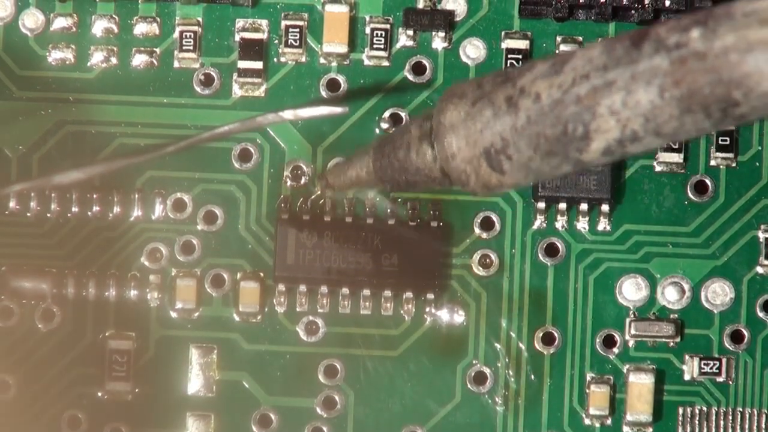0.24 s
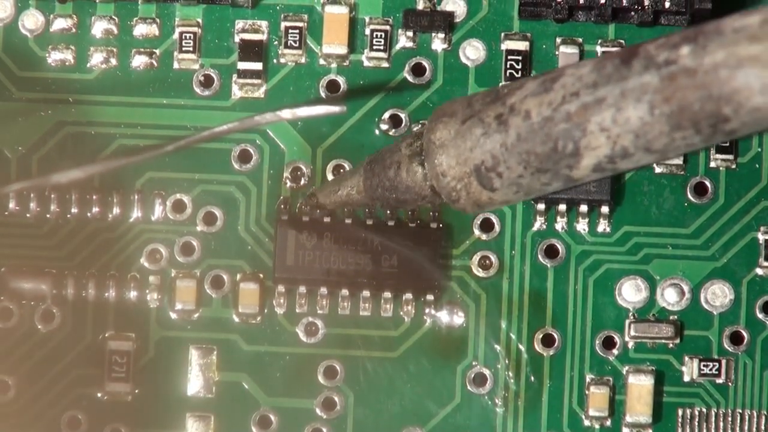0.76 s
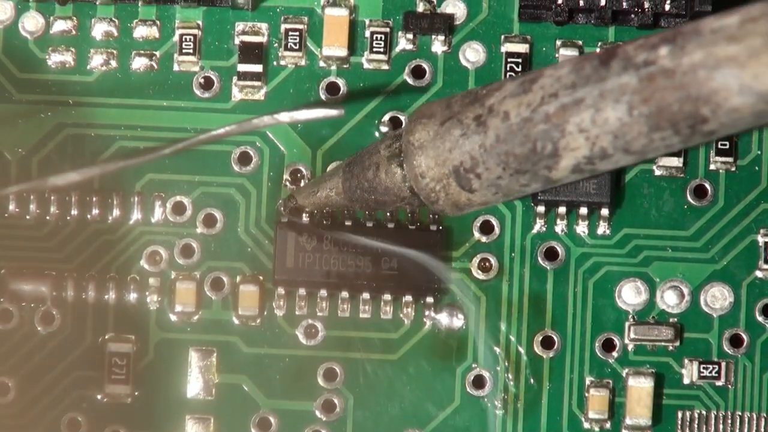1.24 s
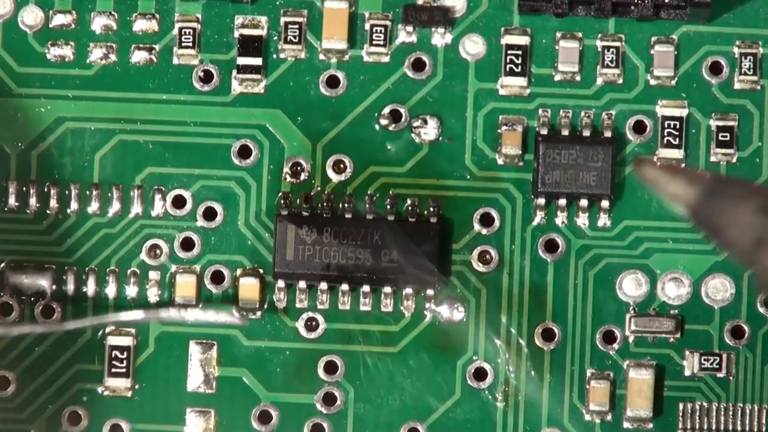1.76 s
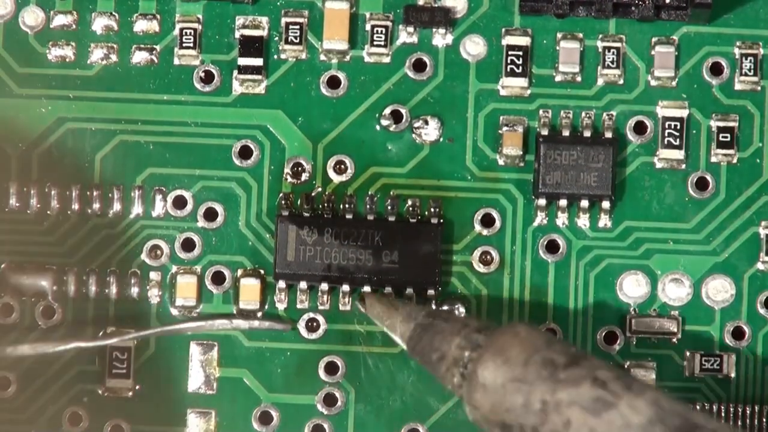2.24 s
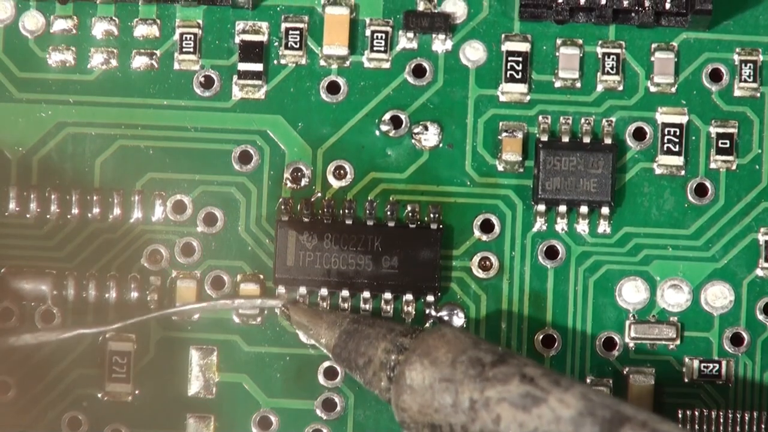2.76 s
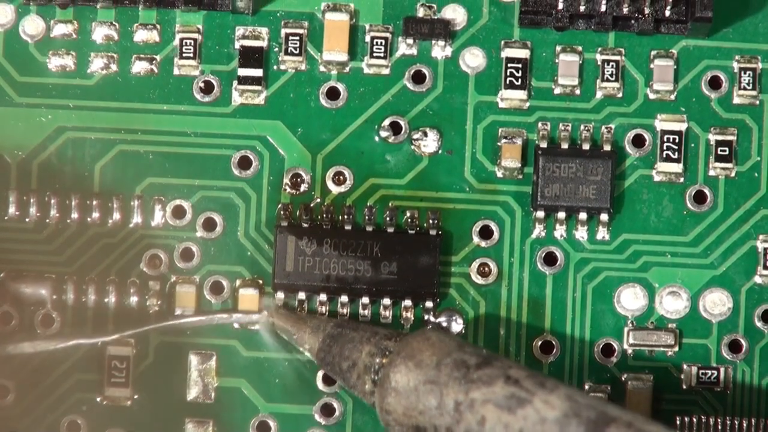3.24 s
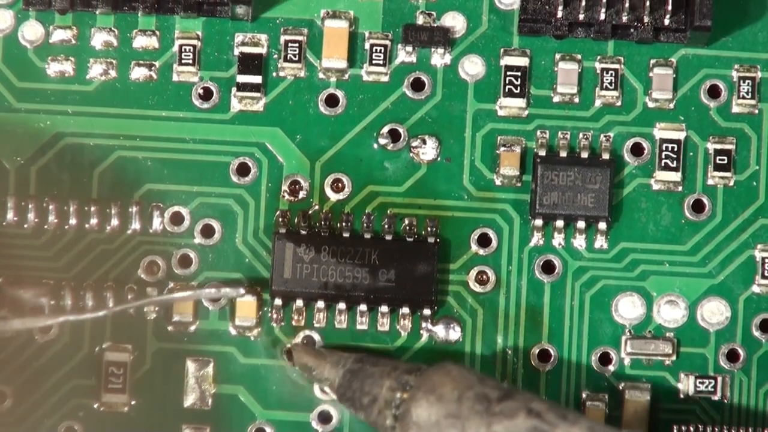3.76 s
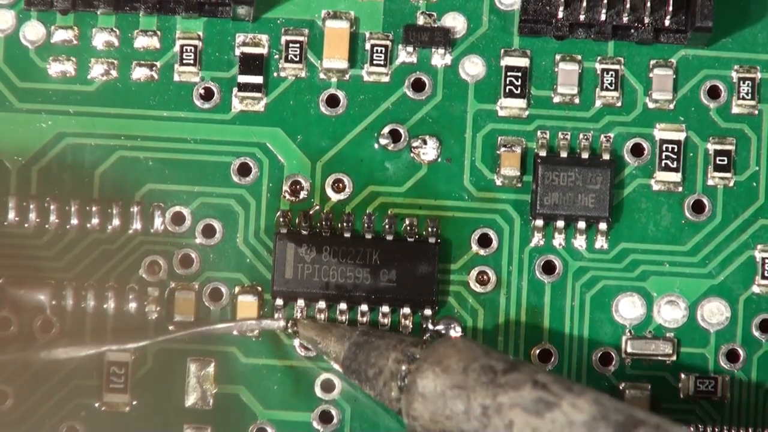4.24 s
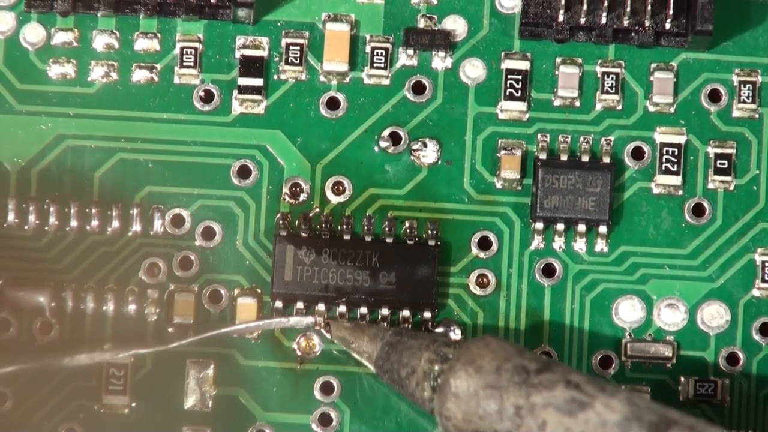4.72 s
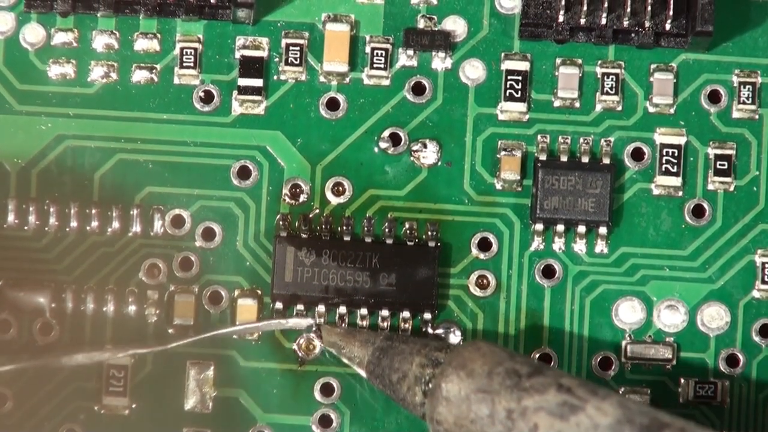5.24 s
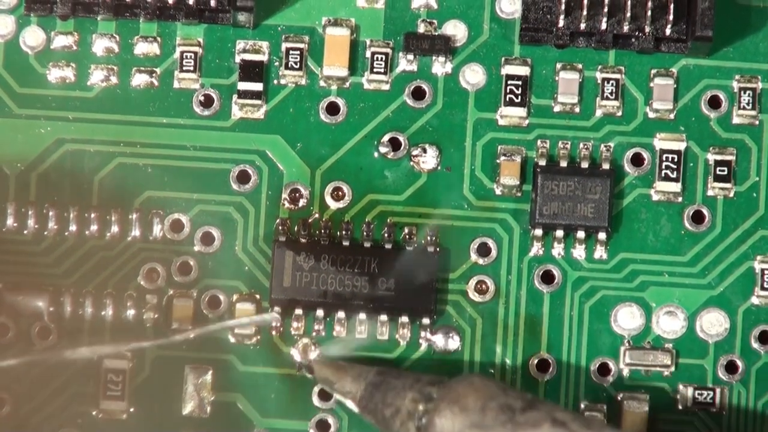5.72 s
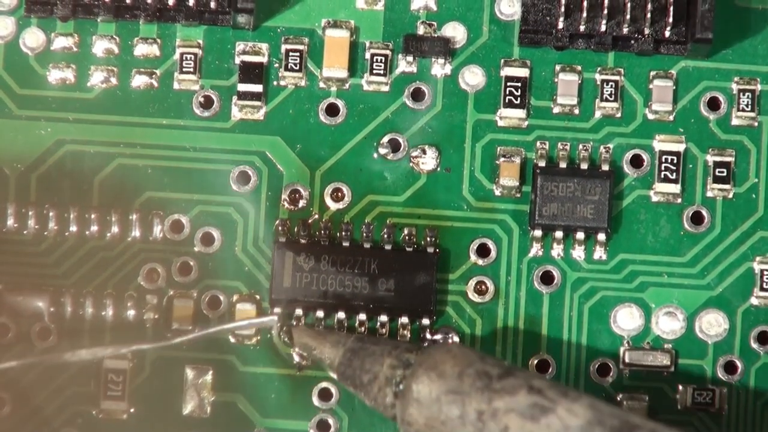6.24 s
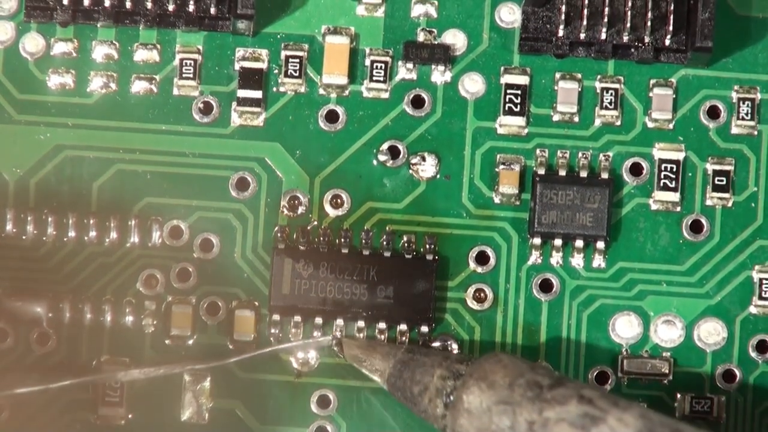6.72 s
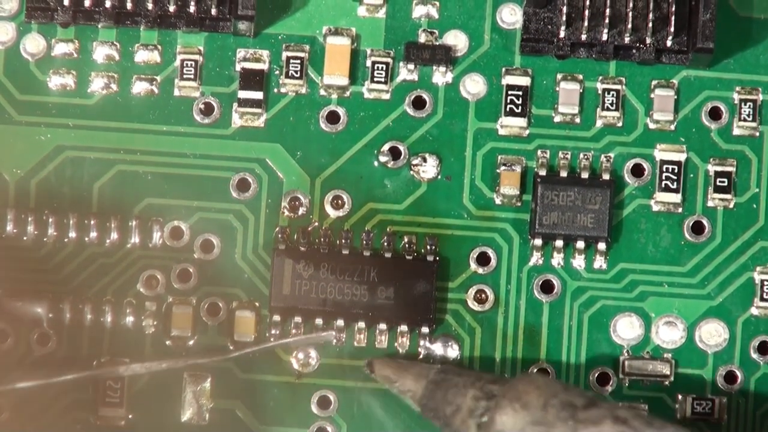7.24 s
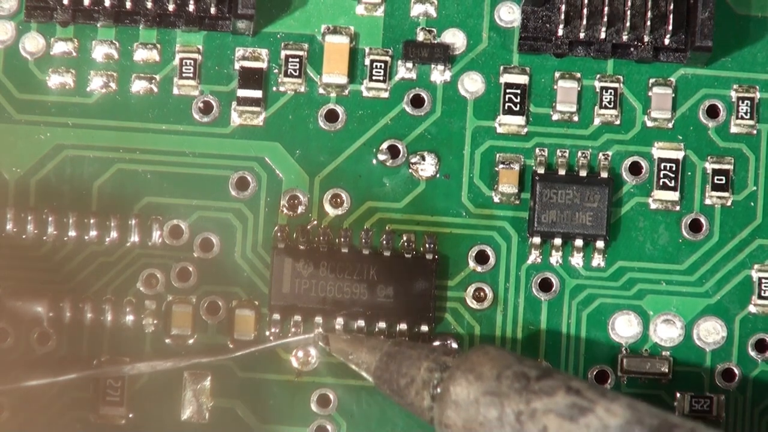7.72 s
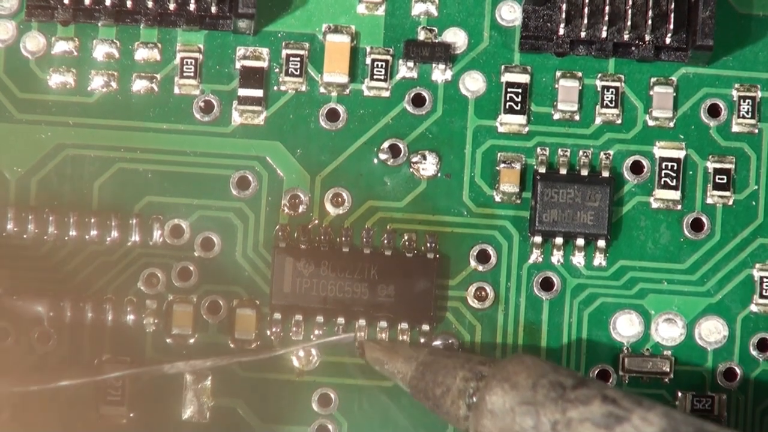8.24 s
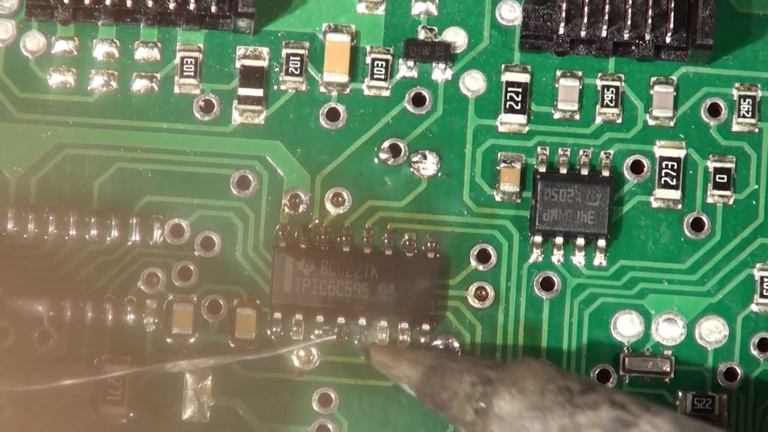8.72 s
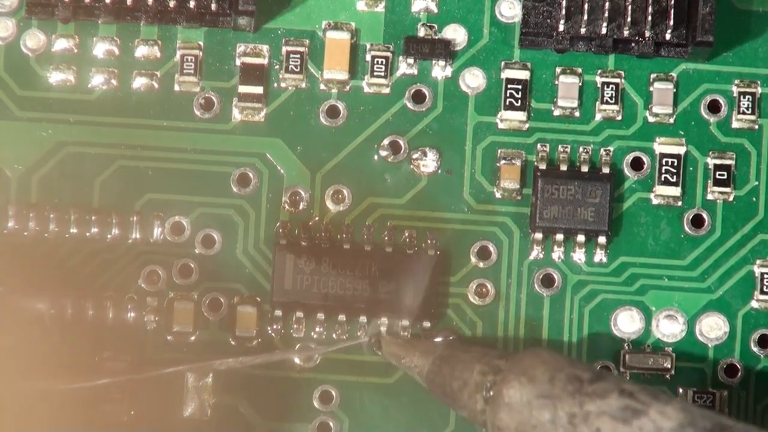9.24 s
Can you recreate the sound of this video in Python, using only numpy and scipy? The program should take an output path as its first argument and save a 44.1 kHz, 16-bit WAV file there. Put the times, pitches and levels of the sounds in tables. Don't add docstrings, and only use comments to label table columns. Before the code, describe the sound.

A steady electrical hum with a fine metallic buzz runs throughout while a soldering iron makes sparse small ticks on circuit board pins.

```python
import sys
import numpy as np
from scipy import signal
from scipy.fft import rfft, irfft, next_fast_len
from scipy.io import wavfile

SR = 44100
rng = np.random.default_rng(int(sys.argv[2]) if len(sys.argv) > 2 else 0)


def linear_from_db(decibels):
    return 10 ** (np.asarray(decibels, float) / 20)


def master(y):
    cut = np.clip(np.atleast_2d(y).T, -1, 1)
    pcm = np.round(cut * 32767)
    wavfile.write(sys.argv[1], SR, pcm.astype(np.int16))


N = 418509

# time in seconds, frequency in Hz.
MAINS = [(0, 50.0492), (1.9, 50.0516), (3.7, 50.0523), (5.6, 50.0515), (7.5, 50.0491), (9.5, 50.0448)]


def evened(x):
    return x / np.sqrt(np.mean(x ** 2) + 1e-30)


def read(points, hz):
    f, value = np.transpose(points)
    return np.interp(np.log(hz + 1), np.log(f + 1), value)


def add(mix, s, sound):
    part = mix[round(s * SR):][:len(sound)]
    part += sound[:len(part)]


def coloured(x, points):
    length = x.shape[-1]
    size = next_fast_len(length)
    gain = linear_from_db(read(points, np.fft.rfftfreq(size, 1 / SR)))
    return irfft(rfft(x, size) * gain, size)[..., :length]


def band(x, lo_hz, hi_hz):
    edges = np.clip([lo_hz, hi_hz], 10, SR / 2.1)
    return signal.sosfilt(signal.butter(2, edges, "band", fs=SR, output="sos"), x)


def floor():
    # frequency in Hz, level in dB per Hz.
    air_curve = [(20, -85), (35, -87.5), (75, -81.5), (125, -82), (225, -74.5), (375, -83.5), (700, -85.5),
                 (1600, -88.5), (2100, -91.5), (3200, -93.5), (7000, -99.5), (9000, -99.5), (11800, -97.5),
                 (14700, -102)]
    # frequency in Hz, level in dB per Hz.
    hiss_curve = [(60, -136), (125, -124), (225, -84.5), (425, -82.5), (900, -83.5), (1600, -87.5),
                  (2200, -90), (3500, -95), (7000, -102), (10800, -104), (11800, -113)]
    white = rng.standard_normal((2, N)) * np.sqrt(SR / 2)
    air = linear_from_db(-1.0) * coloured(white[0], air_curve)
    hiss = linear_from_db(-0.5) * coloured(white[1], hiss_curve)
    return air * linear_from_db([[-.8], [.8]]) + hiss * np.array([[1], [-1]])


def mains_turns():
    return np.cumsum(np.interp(np.arange(N) / SR, *np.transpose(MAINS))) / SR


def hum():
    # multiple of mains, left level in dB, right level in dB.
    strong = [(2, -48.5, -48.5), (3, -51, -49.5), (4, -46.5, -48), (5, -58, -55), (6, -48, -47.5),
              (7, -72, -96), (8, -88.5, -84), (9, -66, -64.5), (10, -82, -70), (11, -63.5, -63.5),
              (12, -77, -61), (13, -59.5, -67), (14, -71, -61.5), (15, -73, -63.5), (16, -72, -65),
              (17, -67.5, -64.5), (18, -76, -66), (20, -77, -64.5), (21, -69.5, -66), (22, -87, -67.5),
              (23, -84, -73), (24, -68, -64.5), (25, -73, -62.5), (26, -89, -79), (31, -66, -58.5),
              (32, -68.5, -64), (33, -68.5, -66), (34, -78, -78), (35, -72, -68.5), (45, -66.5, -62.5)]
    # frequency in Hz, level in dB.
    faint = [(50, -77.5), (900, -79), (1500, -81), (2000, -80), (2600, -82.5), (3200, -81), (4500, -95),
             (7000, -84), (8500, -87.5)]
    # multiple of mains, level in dB.
    whine = [(40, -76), (44, -84), (48, -74.5), (50, -79), (51, -73), (53, -73), (54, -71), (63, -85),
             (69, -76), (74, -74.5), (76, -78.5), (88, -77.5), (89, -74.5), (91, -74.5), (97, -90),
             (37, -74), (104, -78), (112, -80), (133, -81), (138, -78)]
    order = np.arange(171)
    db = read(faint, order * MAINS[0][1]) + 3.0 * rng.standard_normal((2, 171)).clip(-3, 1.5)
    for k, left_db, right_db in strong:
        db[:, round(k)] = left_db, right_db
    for k, whine_db in whine:
        db[:, round(k)] = whine_db

    core_kick, coil_kick = .394, .413
    kick = np.where(order % 2, coil_kick, core_kick)
    spread = np.pi * order ** 2 / 8.6
    scatter = spread + rng.standard_normal(171) + rng.standard_normal((2, 171)) / 4
    phase = np.where(order <= 6, -2 * np.pi * kick * order, scatter)
    lines = np.where(order > 0, linear_from_db(db) * np.exp(1j * phase), 0)
    lines[1, 1] = lines[0, 1]
    cycle = irfft(lines, 8192) * 8192 / np.sqrt(2)
    turn = mains_turns() % 1
    return np.array([np.interp(turn, np.arange(8192) / 8192, c, period=1) for c in cycle])


def rattle(level_db=-61, jitter_s=6e-5, uneven=.5, swing_db=7, busiest=0.066, case_db=9):
    # frequency in Hz, level in dB.
    plate_curve = [(1500, -61), (2600, -18), (4500, 5), (6500, 5.5), (9000, -0.5), (11800, -1), (14500, -6)]
    # frequency in Hz, width in Hz, level in dB.
    case_modes = [(5160, 32, -10), (5920, 170, -3.5), (6500, 100, -4), (6920, 38, -3.5), (7660, 32, 1),
                  (8420, 48, -6), (9370, 64, 0), (10300, 58, -6), (9890, 150, 0.5), (11700, 38, -3),
                  (11900, 160, 1)]
    place = rng.random(90)
    swing = linear_from_db(swing_db * np.cos(2 * np.pi * (place - busiest)))
    size = swing * rng.choice([-1, 1], 90) * rng.uniform(0.29, 1, 90)
    turns = np.arange(round(N / SR * MAINS[0][1]) + 1)[:, None] + place
    at = np.interp(turns, mains_turns(), np.arange(N)) + jitter_s * SR * rng.standard_normal(turns.shape)
    at = np.clip(at.round(), 0, N - 1).astype(int)
    taps = np.zeros(N)
    np.add.at(taps, at, size * (1 + uneven * rng.standard_normal(turns.shape)))
    taps[-1] = 0

    t = np.arange(3000) / SR
    case = np.zeros(3000)
    for hz, width_hz, db in case_modes:
        decay = np.exp(-np.pi * width_hz * t)
        case += linear_from_db(db + case_db) * 2 * np.pi * width_hz / SR * decay * np.cos(2 * np.pi * hz * t)
    rung = taps + signal.oaconvolve(taps, case)[:N]
    return linear_from_db(level_db) * evened(coloured(rung, plate_curve)) * linear_from_db([[-.4], [.4]])


def sleeve():
    # start in seconds, length in seconds, start level in dB, end level in dB.
    strokes = [
        (1.535, .1, -55, -46.5),
        (1.749, .03, -54, -60),
        (1.863, .03, -58, -60),
    ]
    lift_db_per_s, fibres_per_s = 420, 1500
    out, t = np.zeros(N), np.arange(12000) / SR
    for s, length, start_db, end_db in strokes:
        fine, coarse = rng.standard_normal((2, 12000))
        caught = rng.random(12000) < fibres_per_s / SR
        catches = linear_from_db(rng.exponential(1, 12000).clip(0, 4)) * caught
        fine = evened(fine) + 0.77 * evened(fine * catches)
        press_db = np.interp(t, [0, length], [start_db, end_db])
        press_db -= lift_db_per_s * np.maximum(t - length, 0)
        cloth = evened(band(fine, 5000, 14000)) + linear_from_db(-10) * evened(band(coarse, 1100, 4200))
        add(out, s, linear_from_db(press_db) * cloth)
    return out


def puff(hz, width_hz, decay_s, rise_s):
    t = np.arange(9000) / SR
    noise = evened(band(rng.standard_normal(9000), hz - width_hz / 2, hz + width_hz / 2))
    return noise * (1 - np.exp(-t / rise_s)) * linear_from_db(-60 * t / decay_s)


def forearm():
    # start in seconds, level in dB, pitch in Hz.
    bumps = [(1.153, -50, 3500), (1.375, -55, 920), (1.408, -38.5, 220), (1.405, -52, 1200),
             (1.519, -42, 4470), (1.521, -46.5, 600), (1.748, -40, 736), (1.748, -44.5, 1400),
             (1.762, -45, 260), (1.862, -43, 280), (1.866, -51, 800), (1.875, -49, 2400), (3.197, -47, 420),
             (3.225, -45.5, 230), (6.399, -46, 250), (7.28, -40.5, 325), (7.28, -56, 50), (8.94, -48, 330),
             (1.432, -43, 210), (1.528, -47, 2000), (7.286, -42, 330)]
    out = np.zeros(N)
    for s, db, hz in bumps:
        decay_s = .08 * (hz / 1000) ** -0.38
        add(out, s, linear_from_db(db + 6.0) * puff(hz, .75 * hz, decay_s, 0.034 * decay_s))
    return out


def flux():
    # start in seconds, peak level in dB, pitch in Hz.
    spits = [(1.4775, -46, 5660), (1.7479, -44, 6140), (4.0756, -42, 11900), (7.2914, -46, 6220),
             (7.8107, -46, 6510)]
    out = np.zeros(N)
    for s, db, hz in spits:
        add(out, s, linear_from_db(db - 1.5) * puff(hz, 8400, 0.03, .0004))
    return out


def ticks(events, body, crack_db, crack_s, snap_db=4.5, snap_s=.014):
    # frequency in Hz, level in dB.
    crack_curve = [(700, -32), (1000, -6), (1600, 5.5), (2200, -8), (3200, -5.5), (4300, -7.5), (5300, -14),
                   (6200, -17.5), (12000, -20.5), (15000, -30)]
    lift_per_hard = np.array([-.3, 0, 0.31, 1])
    out, t = np.zeros(N), np.arange(4000) / SR
    chance = rng.standard_normal((len(events), 2 * len(body)))
    grit = evened(coloured(rng.standard_normal((len(events), 4000)), crack_curve))
    hz, db, t60, group = np.transpose(body)[:, :, None]
    rise = 1 - np.exp(-t / 0.00048)
    drain = 1 + linear_from_db(snap_db - 60 * t / snap_s)
    for (s, peak_db, hard_db), luck, noise in zip(events, chance, grit):
        lift_db = hard_db * lift_per_hard[group.round().astype(int)]
        ring = 1 - 0.018 * max(peak_db + 27, 0)
        detune, spread_db = luck.reshape(2, -1, 1)
        decay = linear_from_db(db + lift_db + spread_db - 60 * t / (t60 * ring))
        modes = decay * np.sin(2 * np.pi * hz * (1 + 0.0071 * detune) * t)
        crack = noise * linear_from_db(crack_db + hard_db - 60 * t / crack_s)
        add(out, s, linear_from_db(peak_db - 11.6) * rise * ((modes * drain).sum(0) + crack))
    return out


def iron():
    # start
    # in seconds, peak level in dB, hardness in dB. Modes of the circuit board.
    board = [(860, -35, .05, -4), (1000, -5.5, 0.091, 0.5), (1370, -1, 0.078, 0.5), (1443, -2.5, 0.049, 2),
             (1520, -13, .025, 2), (1164, -7.5, 0.056, 2), (1647, -2.5, 0.045, 2), (1890, -26, 0.043, 2),
             (2535, -13, 0.096, 2), (2810, -6.5, 0.032, 2), (3580, -18.5, 0.06, 3), (4115, -9.5, 0.031, 3),
             (4320, -5, 0.021, 3), (5150, -11.5, 0.028, 3), (6620, -19, 0.02, 3), (7100, -22, 0.047, 3),
             (9100, -31, 0.011, 3), (11300, -41, 0.022, 3)]
    chip = [(1000, -26, 0.028, 0), (1495, 1, 0.034, 1), (1690, 0.5, 0.033, 1), (1720, -11.5, 0.045, 1),
            (2730, -7, .02, 2), (3600, -11, .02, 2), (4180, 2, 0.011, 3), (5200, -12, 0.019, 3),
            (6640, -11, .015, 3), (8600, -10, .015, 3)]
    holder = [(620, -7, 0.062, 0), (1020, -4, 0.062, 0), (1215, -3, 0.058, 1), (1300, -14, .05, 1),
              (1500, -7, 0.036, 1), (2030, -6, .05, 2), (2520, -13, .04, 2), (3620, -4.5, 0.04, 2),
              (4230, -11, .03, 3), (5630, -19, 0.026, 3), (6300, -22, .04, 3), (7350, -15, 0.033, 3),
              (8630, -18, 0.056, 3), (10430, -22, .03, 3), (12000, -14, 0.033, 3)]
    board_ticks = [(1.5197, -34.5, 6), (1.8644, -42, 4), (3.6957, -16, 3.5), (3.8116, -27, -17),
                   (4.6019, -28, -3.5), (5.1208, -29.5, -3), (5.9428, -28.5, -2), (6.3948, -15, 4),
                   (7.9026, -21, 0), (8.2367, -28, -2.5), (8.98, -29, -7), (9.1985, -39, 1)]
    chip_ticks = [(0.7494, -31, 3), (0.843, -32.5, 2), (0.847, -36.5, 3), (1.1545, -37, -3),
                  (6.655, -33, -2)]
    holder_ticks = [(7.2755, -21, -1)]
    pins = ticks(board_ticks, board, -2.5, 0.033) + ticks(chip_ticks, chip, -1.6, 0.032)
    knock = ticks(holder_ticks, holder, -1.5, 0.05, snap_db=9, snap_s=.007)
    return band(pins, 820, 13000) + band(knock, 350, 14000)


def tail():
    # frequency in Hz, time to fall 60 dB in seconds.
    decays = [(300, 0.19), (1000, 0.17), (3000, 0.14), (8000, 0.093)]
    hz, t, z = signal.stft(rng.standard_normal((2, SR // 2)), SR, nperseg=128)
    tails = signal.istft(z * linear_from_db(-60 * t / read(decays, hz)[:, None]), SR, nperseg=128)[1]
    return tails / np.linalg.norm(tails[0])


def scene():
    steady = floor() + hum() + rattle()
    near = sleeve() + forearm() + flux() + iron()
    walls = np.pad(tail(), ((0, 0), (150, 0)))
    wet = signal.fftconvolve(near[None], walls, axes=1)[:, :N]
    return steady + near * linear_from_db([[-.6], [.6]]) + linear_from_db(-13.5) * wet


def low_pass(x):
    return signal.sosfilt(signal.butter(12, 14960, fs=SR, output="sos"), x)


def record(dry):
    # frequency in Hz, gain in dB.
    top_curve = [(10000, 0), (13000, 1.2), (14800, 1.2), (15000, 0), (15300, -60)]
    mid = coloured(dry.mean(0), top_curve)
    side_curve = [(30, -11), (80, -3), (150, -38), (230, -4), (400, -5.5), (11300, 1.0), (11420, -48)]  # Hz, dB
    side = coloured((dry[0] - dry[1]) / 2, side_curve)
    return low_pass(np.array([mid + side, mid - side]))


dry = scene()
out = record(dry)
master(out)
```